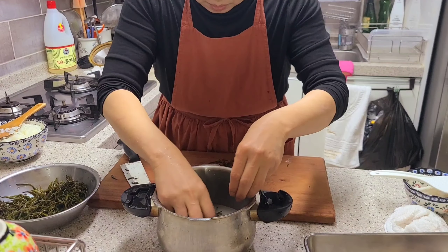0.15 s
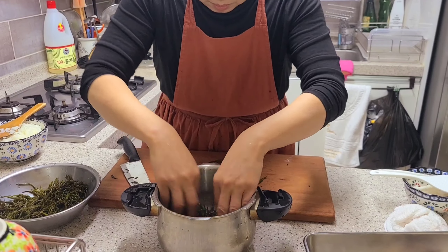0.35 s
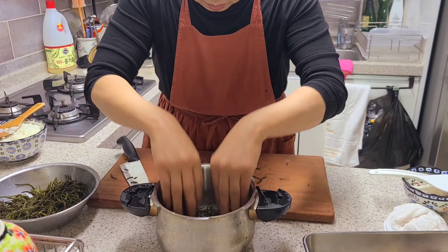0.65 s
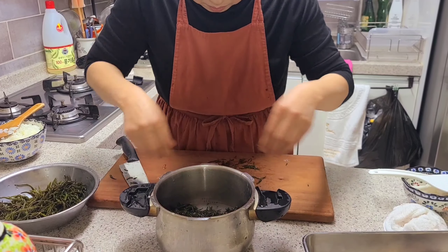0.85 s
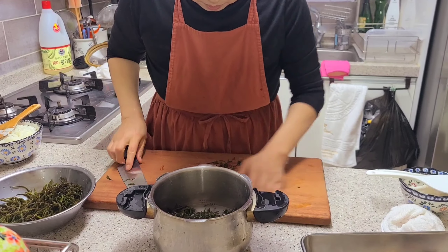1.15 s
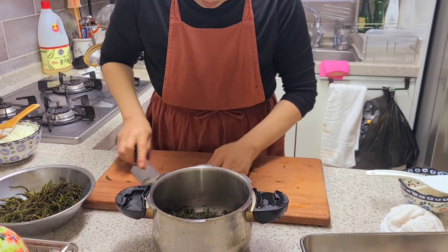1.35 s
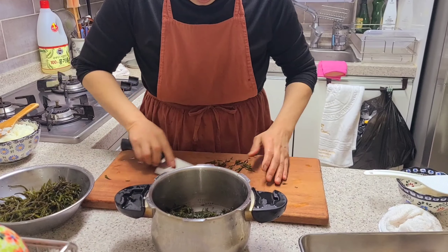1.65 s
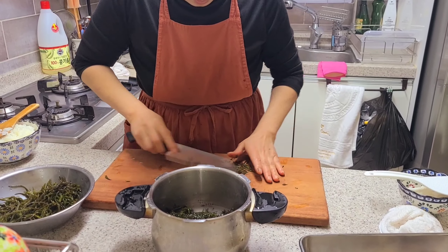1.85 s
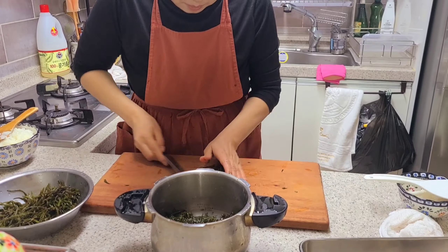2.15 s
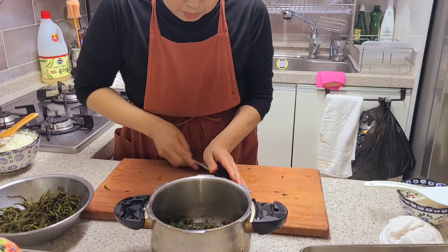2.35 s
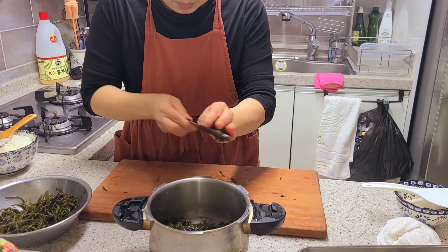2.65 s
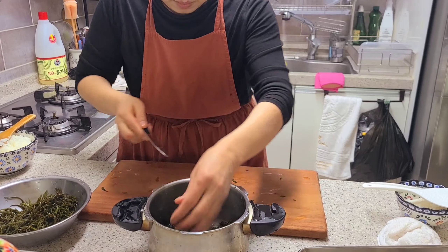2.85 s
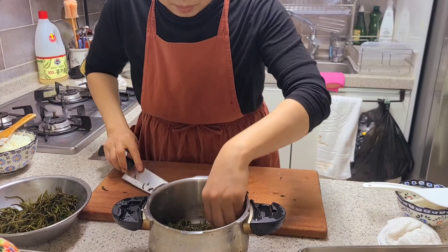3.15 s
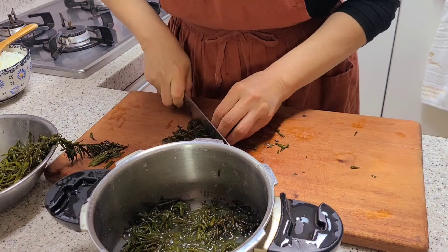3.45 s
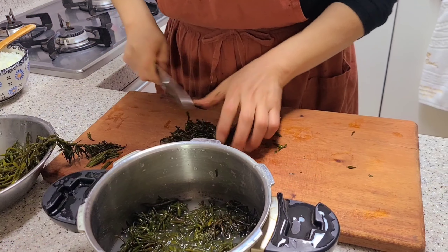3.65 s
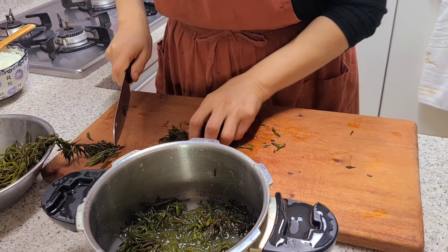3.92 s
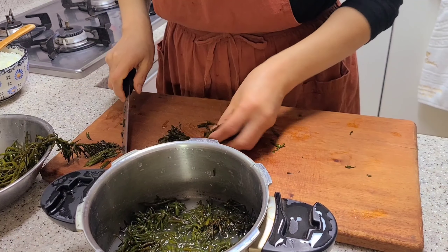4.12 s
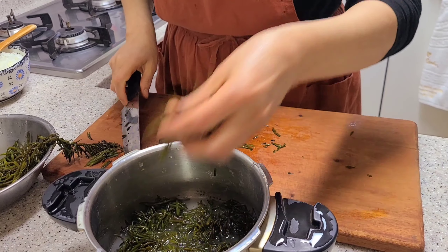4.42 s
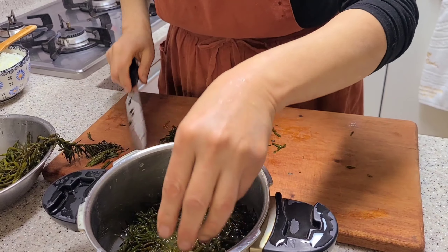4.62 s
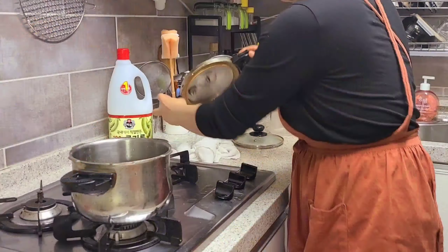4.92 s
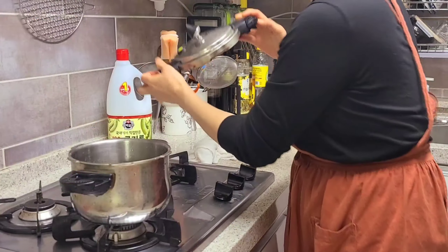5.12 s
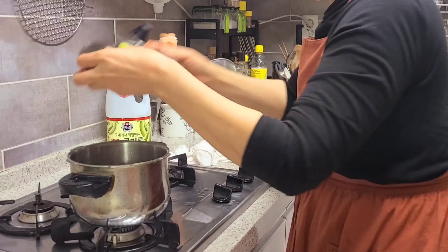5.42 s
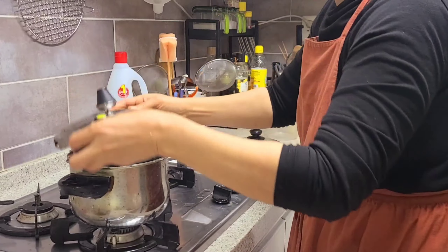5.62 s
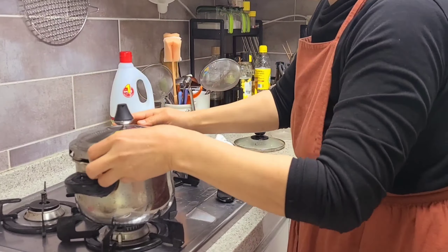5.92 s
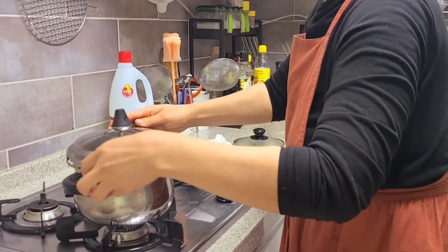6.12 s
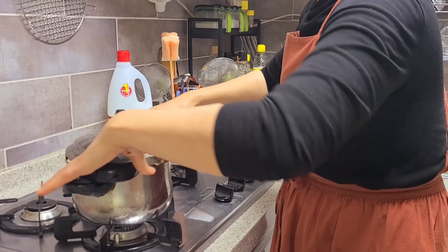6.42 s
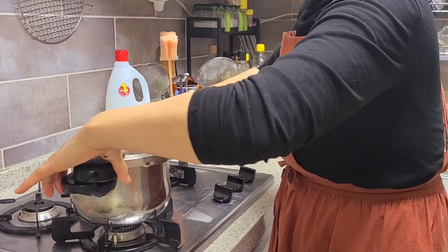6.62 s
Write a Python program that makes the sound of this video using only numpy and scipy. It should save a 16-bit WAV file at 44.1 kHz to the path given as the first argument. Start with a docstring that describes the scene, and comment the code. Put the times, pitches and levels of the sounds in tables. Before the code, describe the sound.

Wet greens rustle and a knife knocks and scrapes on a thick wooden board, then a steel pressure cooker lid clinks, scrapes and clunks shut.

```python
"""A bump of the cooker, then rustling wet greens and a knife knocking and scraping on a thick board in a kitchen.
Later a steel lid chatters over the rim of a pressure cooker, clinks and clunks, and its handle squeaks.
Blows ring banks of resonances; sliding drives them with tiny random catches and adds coloured hiss.
Greens are crackling noise, squeaks are wavering harmonics, and hob and still air are shaped noise."""
import sys
import numpy as np
from scipy import signal
from scipy.fft import rfft, irfft, next_fast_len
from scipy.io import wavfile
from scipy.ndimage import uniform_filter1d

SR = 44100
rng = np.random.default_rng(int(sys.argv[2]) if len(sys.argv) > 2 else 0)


def generate_wav(signal):
    """Clip the signal to [-1, 1] and save it as 16-bit WAV at the path in sys.argv[1]."""
    frames = np.transpose(np.atleast_2d(signal))
    scaled = np.clip(frames, -1, 1) * 32767
    pcm = np.round(scaled).astype(np.int16)
    wavfile.write(sys.argv[1], SR, pcm)


N = 298557
TIME = np.arange(N) / SR


def from_db(db):
    """Decibels to gain."""
    return 10 ** (np.asarray(db) / 20)


def rms_one(x):
    """Scale to unit power."""
    return x / np.sqrt(np.mean(x ** 2) + 1e-20)


def at_hz(points, hz):
    """Read a table on a log-frequency axis."""
    table = np.array(points)
    return np.interp(np.log(np.maximum(hz, 1)), np.log(table[:, 0]), table[:, 1])


def add(out, start_s, sound):
    """Mix a stereo sound in at a time."""
    at = round(start_s * SR)
    out[:, at:at + sound.shape[1]] += sound[:, :N - at]


def drift(per_s):
    """Smooth random wander of spread 1."""
    points = rng.standard_normal(N // 16)
    return rms_one(np.interp(TIME * per_s, np.arange(N // 16), points))


# how alike the two microphones hear noise: pitch_hz, correlation (no unit)
LIKENESS = [(100, 0.96), (350, 0.94), (800, 0.61), (1500, .15), (4000, 0)]


def noise(spectrum=((1, 0), (SR, 0)), size=N):
    """Coloured noise at two microphones, alike in the bass and unrelated in the treble."""
    padded = next_fast_len(size, real=True)
    hz = np.fft.rfftfreq(padded, 1 / SR)
    mid, side = rfft(rng.standard_normal((2, padded))) * from_db(at_hz(spectrum, hz))
    alike = np.clip(at_hz(LIKENESS, hz), -1, 1)
    pair = np.sqrt(1 + alike) * mid + np.sqrt(1 - alike) * side * [[1], [-1]]
    return rms_one(irfft(pair, padded)[:, :size])


def resonate(x, modes):
    """Parallel resonances of alternating sign; a wider one dies away sooner."""
    out = 0
    for k, (hz, width_hz, level_db) in enumerate(modes):
        r = np.exp(-np.pi * width_hz / SR)
        feed = np.array([1, 0, -1]) * (1 - r * r) / 2
        feedback = [1, -2 * r * np.cos(2 * np.pi * hz / SR), r * r]
        out = out + (-1) ** k * from_db(level_db) * signal.lfilter(feed, feedback, x)
    return out


def stroke(start_s, length_s, attack_s, release_s):
    """Envelope of one movement: it swells, holds to the end of its length and dies away."""
    age = TIME - start_s
    swell = np.sin(np.pi / 2 * np.clip(age / attack_s, 0, 1)) ** 2
    return swell * np.exp(-np.clip((age - length_s) / release_s, 0, 20))


def friction(rough_db, slips_per_s):
    """The uneven grip of a sliding contact."""
    return rms_one(from_db(rough_db * np.clip(drift(slips_per_s), -2, 2)))


def slips(per_s, spread_db):
    """Tiny catches of a sliding contact: random clicks of very unequal size, different at each microphone."""
    size = from_db(spread_db * np.minimum(rng.exponential(1, N), 3.5))
    happens = rng.random(N) < per_s / SR
    return rms_one(happens * size * rng.standard_normal((2, N)))


def radiate(source, spectrum, ring_s):
    """One contact shakes a thin plate, whose crowded modes reach each microphone with their own colour."""
    t = TIME[:SR // 20]
    plate = noise(spectrum, size=len(t)) * np.exp(-t / ring_s)
    return rms_one(signal.fftconvolve(source[None], plate, axes=1)[:, :N])


def first_10_ms(x):
    """Scale to unit power over the first 10 ms."""
    return x / np.sqrt(np.mean(x[:, :SR // 100] ** 2))


def blows(rows, modes, vary_db, bass_hz, firm_hz, soft_bass_db, tick_s, dense_db, dense_s, dense_hz,
          graze_db, graze_s, favour_db=0, favour_width=0.34):
    """Each contact rings the main modes and a dense short-lived body; the spot struck may favour one pitch."""
    out, t = np.zeros((2, N)), TIME[:SR // 5]
    dense_colour = [(dense_hz / 50, -25), (dense_hz / 15, 0), (dense_hz, 0), (2 * dense_hz, -22)]
    for start_s, level_db, contact_hz, tick_db, *favoured in rows:
        # the surfaces graze for a few milliseconds after they meet
        graze = noise(size=len(t)) * t * np.exp(-t / graze_s)
        graze = graze / np.sqrt(np.sum(graze ** 2) / 2)
        push = (t == 0) + from_db(graze_db) * graze + 1e-18
        # every blow excites the modes a little differently
        varied = np.array(modes) + np.outer(vary_db * rng.standard_normal(len(modes)), [0, 0, 1])
        ring = resonate(push, varied)
        dense = noise(dense_colour, size=len(t)) * np.exp(-t / dense_s)
        body = first_10_ms(ring) + from_db(dense_db) * first_10_ms(dense)
        # a soft contact leaves the high modes out, and gains bass for each octave that it lies under a firm one
        body = signal.sosfilt(signal.butter(2, min(contact_hz, SR / 2 - 1), fs=SR, output="sos"), body)
        bass_db = soft_bass_db * np.log2(firm_hz / contact_hz)
        bass = signal.lfilter(*signal.butter(1, bass_hz, fs=SR), body)
        body = body + (from_db(bass_db) - 1) * bass
        body = body + resonate(body, [(hz, favour_width * hz, favour_db) for hz in favoured])
        tick = noise(size=len(t)) * np.exp(-t / tick_s)
        blow = first_10_ms(body) + from_db(tick_db) * first_10_ms(tick)
        add(out, start_s, from_db(level_db) * blow)
    return out


# time for the tail to fall by 60 dB: pitch_hz, decay_s
ROOM_T60 = [(80, 0.68), (300, 0.4), (800, 0.38), (1700, 0.43), (4000, 0.33), (8000, .3), (15000, 0.24)]
# standing wave between the walls: pitch_hz, width_hz, level_db
ROOM_MODE = [(71, 8.5, 4)]


def kitchen(x, early_db, late_db, early_t60_s=0.11):
    """Quick reflections from the worktop and tiles, then the tail and the low boom of the room."""
    t = TIME[:SR // 2]
    hz = np.fft.rfftfreq(len(t), 1 / SR)
    field = rfft(noise(size=len(t)))
    tail = 0
    for centre_hz, t60_s in ROOM_T60:
        # overlapping bands, each with its own decay
        share = at_hz([(f, f == centre_hz) for f, _ in ROOM_T60], hz)
        tail = tail + irfft(field * share, len(t)) * from_db(-60 * t / t60_s)
    early = noise(size=len(t)) * from_db(-60 * t / early_t60_s)
    echoes = from_db(early_db) * rms_one(early * (t > .002)) + from_db(late_db) * rms_one(tail * (t > .008))
    reflected = signal.fftconvolve(x, echoes / np.sqrt(len(t)), axes=1)[:, :N]
    return x + reflected + resonate(x, ROOM_MODE)


# colour of the kitchen's still air: pitch_hz, level_db
AIR_COLOUR = [(20, -31), (40, -17.5), (55, 0), (72, 0.5), (100, -13.5), (140, -21.5), (240, -13),
              (330, -20), (600, -23.5), (1300, -24.5), (3000, -29.5), (5000, -34.5), (7500, -35),
              (16000, -44.5)]
AIR_DB = -64.5


def still_air():
    """Steady coloured noise, the quiet of the kitchen."""
    return from_db(AIR_DB) * noise(AIR_COLOUR)


# colour of the hob swaying: pitch_hz, level_db
SWAY_COLOUR = [(10, 8.5), (20, 14), (26, 16.5), (34, 6), (50, 5), (100, -60.5)]
# colour of the cooker grinding on the grate: pitch_hz, level_db
GRIND_COLOUR = [(35, -8), (55, 0.5), (72, 3), (90, -0.5), (120, -3.5), (200, -6), (450, -18.5), (800, -32),
                (2000, -59)]
# shoves that grind the cooker: start_s, length_s, level_db
SHOVES = [(5.867, 0.17, -43), (6.085, 0.073, -33), (6.527, 0.08, -44)]
SHOVE_ATTACK_S, SHOVE_RELEASE_S = 0.016, 0.1
# the hob sways as the hands lean on the lid, and settles as they let go
LEAN_START_S, LEAN_LENGTH_S, LEAN_ATTACK_S, LEAN_RELEASE_S, LEAN_DB = 5.81, 0.51, 0.17, 0.48, -41


def hob():
    """The heavy cooker sways under the hands and grinds on the grate at each shove."""
    sway = from_db(LEAN_DB) * stroke(LEAN_START_S, LEAN_LENGTH_S, LEAN_ATTACK_S, LEAN_RELEASE_S)
    grind = sum(from_db(level_db) * stroke(start_s, length_s, SHOVE_ATTACK_S, SHOVE_RELEASE_S)
                for start_s, length_s, level_db in SHOVES)
    return sway * noise(SWAY_COLOUR) + grind * noise(GRIND_COLOUR)


# wet greens gathered and dropped: start_s, level_db, time_to_peak_s
RUSTLES = [(0.33, -68, 0.028), (0.532, -59.5, 0.0036), (0.558, -54, 0.0087), (1.061, -61.5, 0.077),
           (2.917, -55.5, 0.01), (3.546, -61.5, 0.0098), (3.608, -63.5, 0.0084), (3.794, -70.5, 0.061),
           (4.523, -53.5, 0.011)]
# colour of the leaves: pitch_hz, level_db
LEAF_COLOUR = [(300, -1), (900, -10), (1500, 0.5), (2200, 0.5), (3300, -4.5), (5000, -5), (9000, -9.5),
               (16000, -13)]


def greens():
    """Each handful is a short swell of wet crackle."""
    swell = 0
    for start_s, level_db, peak_s in RUSTLES:
        age = np.maximum(TIME - start_s, 0) / peak_s
        swell = swell + from_db(level_db) * age * np.exp(1 - age)
    return swell * noise(LEAF_COLOUR) * friction(rough_db=2.5, slips_per_s=460)


# stick-slip of the knife on the wood and of the lid's handle: start_s, length_s, pitch_hz, level_db
SQUEAKS = [(1.12, .028, 266, -41.5), (1.221, .022, 400, -42), (2.035, .09, 448, -38),
           (5.098, .018, 785, -54), (6.584, .018, 528, -29), (6.60, .03, 528, -20.5)]
# harmonics of a squeak: multiple (of the pitch), level_db
SQUEAK_PARTIALS = [(1, 6), (2, -16), (3, -14), (4, -23), (5, -25), (6, -29)]
SQUEAK_ATTACK_S, SQUEAK_RELEASE_S = .009, .009
SQUEAK_SAG = 0.054   # share of its pitch that a squeak loses as the motion slows


def squeaks(jitter=0.02, rough_db=2.5):
    """Sticking and slipping in a nearly regular rhythm gives short rough tones that sag in pitch."""
    out, waver = 0, 1 + jitter * drift(300)
    for start_s, length_s, hz, level_db in SQUEAKS:
        sag = 1 - SQUEAK_SAG * np.clip((TIME - start_s) / length_s, 0, 1)
        phase = 2 * np.pi * np.cumsum(hz * waver * sag) / SR
        tone = sum(from_db(partial_db) * np.sin(multiple * phase) for multiple, partial_db in SQUEAK_PARTIALS)
        envelope = stroke(start_s, length_s, SQUEAK_ATTACK_S, SQUEAK_RELEASE_S)
        out = out + from_db(level_db) * rms_one(tone) * envelope
    return out * friction(rough_db, 250) * np.ones((2, 1))


# the cooker is bumped, on the worktop and later on the hob: start_s, level_db, contact_cutoff_hz, tick_db
CLUNKS = [(0.1205, -35.5, 1000, -24), (5.797, -36, 1200, -29), (5.839, -27.5, 1300, -32),
          (5.8725, -13.5, 1400, -24), (5.981, -17.5, 680, -31), (5.997, -18, 900, -34),
          (6.023, -17, 1500, -29), (6.041, -25.5, 1500, -27), (6.064, -26, 1200, -28),
          (6.562, -33.5, 900, -35), (6.623, -25, 1800, -15.5), (6.724, -41.5, 3200, -26)]
# resonances of the loaded cooker: pitch_hz, width_hz, level_db
COOKER = [(215.3, 41, -7), (285, 26, -1.5), (317, 18.4, 6.5), (405, 38, 5.5), (475, 43, 2.5),
          (562, 78, -3.5), (687, 40, -4.5), (851, 42, -4.5), (994, 71, -3), (1080, 84, -2.5),
          (1257, 50, -4.5), (1500, 170, -12.5)]


def cooker_clunks():
    """Mostly soft bumps leave the treble out and ring the low modes of the loaded cooker."""
    return blows(CLUNKS, COOKER, vary_db=0.0, bass_hz=250, firm_hz=2000, soft_bass_db=5, tick_s=0.007,
                 dense_db=-7.5, dense_s=0.017, dense_hz=3400, graze_db=-10.0, graze_s=0.0013)


# lid sliding on the rim: start_s, length_s, ring_db, hiss_db
SLIDES = [(5.276, 0.047, -42.5, -66), (5.408, 0.095, -37, -53), (5.454, 0.034, -28, -32.5),
          (5.528, 0.021, -24.5, -29), (5.706, 0.078, -50.5, -69), (5.785, 0.069, -50, -47.5),
          (5.887, 0.11, -26, -38.5), (6.014, 0.057, -30, -27.5), (6.104, 0.082, -28, -30.5),
          (6.262, 0.01, -33, -42), (6.564, 0.064, -41.5, -43.5)]
# steel lid and rim, damped by hands and gasket: pitch_hz, width_hz, level_db
STEEL = [(430, 96, -8.5), (606, 62, -3.5), (1055, 40, -10.5), (1276, 41, -3), (1490, 100, -6.5),
         (1713, 99, -7), (1912, 64, -2), (2079, 34, 5), (2207, 68, -2.5), (2500, 61, -2), (2747, 65, -0.5),
         (3000, 71, 3), (3134, 49, 3), (3260, 31, 5.5), (3310, 26, 3.5), (3520, 194, -3.5),
         (3890, 22, -8.5), (4030, 42, -3), (4300, 193, -7), (4884, 44, -11), (6000, 310, -21),
         (6570, 70, -32), (7020, 81, -13), (7140, 20, -10), (7240, 60, -26), (8700, 140, -39.5)]
# colour of the rubbing rim: pitch_hz, level_db
RIM_HISS = [(300, -4.5), (600, 4), (1200, 14), (2500, 11.5), (4300, 14), (5300, 3.5), (7000, 16),
            (9000, -16), (12000, 1), (14000, 3.5), (16000, -13)]
SLIDE_ATTACK_S, RING_RELEASE_S, HISS_RELEASE_S = 0.012, 0.034, 0.014


def lid_slides(ring_trim_db=-3, hiss_trim_db=-1):
    """Steel chatters over steel and keeps lid and rim ringing; the hiss stops sooner than the ring."""
    ring_level = sum(from_db(ring_db) * stroke(start_s, length_s, SLIDE_ATTACK_S, RING_RELEASE_S)
                     for start_s, length_s, ring_db, _ in SLIDES)
    hiss_level = sum(from_db(hiss_db) * stroke(start_s, length_s, SLIDE_ATTACK_S, HISS_RELEASE_S)
                     for start_s, length_s, _, hiss_db in SLIDES)
    grain = friction(rough_db=4.5, slips_per_s=250) * rng.standard_normal(N)
    ring = rms_one(resonate(slips(per_s=300, spread_db=3.5), STEEL))
    hiss = radiate(grain, RIM_HISS, ring_s=0.0055)
    return from_db(ring_trim_db) * ring_level * ring + from_db(hiss_trim_db) * hiss_level * hiss


# lid touches the rim: start_s, level_db, contact_cutoff_hz, tick_db
CLINKS = [(5.046, -42, 4500, -27), (5.259, -44, 6000, -28.5), (5.291, -39.5, 4000, -25),
          (5.419, -38, 3500, -32), (5.466, -30, 7000, -18), (5.539, -21, 9100, -16),
          (5.549, -26, 6000, -28), (5.796, -34, 6000, -5), (5.838, -35.5, 5000, -20),
          (5.875, -23, 4960, -9), (5.984, -26, 9100, -5.5), (6.026, -26, 8000, -6),
          (6.067, -24.5, 8000, -16), (6.126, -25, 8050, -15), (6.522, -42, 3000, -21),
          (6.562, -36.5, 5000, -11)]


def lid_clinks():
    """Hard edges meet with a long graze and ring the damped steel of lid and rim."""
    return blows(CLINKS, STEEL, vary_db=3.0, bass_hz=900, firm_hz=6000, soft_bass_db=6.5, tick_s=0.0021,
                 dense_db=-9.0, dense_s=0.02, dense_hz=6000, graze_db=14, graze_s=0.0039)


# sweeps of the blade over the wood: start_s, length_s, level_db, weight_db (pressure on the blade)
SWEEPS = [(1.289, .19, -32.5, -20), (1.656, 0.086, -31, -18), (2.099, 0.096, -33.5, -6.5),
          (2.258, 0.068, -35.5, -2.5)]
# resonances of the knife blade: pitch_hz, width_hz, level_db
BLADE = [(260, 53, -25), (430, 63, -19), (600, 61, -3), (699, 77, 1.5), (1200, 55, 3.5), (1400, 140, -4),
         (1814, 100, 3.5), (2328, 69, 1.5), (3020, 120, -2.5), (3690, 180, -6.5), (4330, 250, -13)]
# colour of the edge on the grain: pitch_hz, level_db
WOOD_HISS = [(600, -24.5), (1500, 1), (3000, -2), (4500, -1.5), (7000, 0.5), (10000, -1), (16000, -5)]
# colour of the board under the drag: pitch_hz, level_db
BOARD_RUMBLE = [(30, -21), (75, -1), (110, -2.5), (220, -2.5), (450, -2), (700, -4.5), (1500, -32.5)]
SWEEP_RELEASE_S = .026
HISS_LOSS_PER_WEIGHT = 0.52   # dB of hiss lost for each dB of weight: a heavy blade rumbles, a light one hisses
# pressed hard after its knock, the edge skips over the wood before it slides
SKID_START_S, SKID_LENGTH_S, SKID_ATTACK_S, SKID_RUMBLE_DB = 2.005, 0.11, .009, -40


def knife_sweeps(blade_db=-1, hiss_db=-13, board_db=-4, bend=.03):
    """Wood grain catches on the edge: it hisses, rings the blade and rumbles in the board."""
    # scraps of greens under the edge make the drag lumpy
    lumps = friction(rough_db=1.8, slips_per_s=70)
    grip = lumps * friction(rough_db=3.0, slips_per_s=500)
    catches = lumps * slips(per_s=700, spread_db=3.0)
    blade, edge = 0, 0
    board = from_db(SKID_RUMBLE_DB) * stroke(SKID_START_S, SKID_LENGTH_S, SKID_ATTACK_S, SWEEP_RELEASE_S)
    for start_s, length_s, level_db, weight_db in SWEEPS:
        # the blade gathers speed over the whole sweep
        speed = from_db(level_db) * stroke(start_s, length_s, length_s, SWEEP_RELEASE_S)
        blade = blade + from_db(blade_db) * speed
        edge = edge + from_db(hiss_db - HISS_LOSS_PER_WEIGHT * weight_db) * speed
        board = board + from_db(board_db + weight_db) * speed
    # the contact point travels along the blade, which bends its resonances up and down
    warped = np.cumsum(1 + bend * drift(14)) / SR

    def bent(sound):
        """Play at a wandering speed."""
        return rms_one(np.array([np.interp(warped, TIME, side) for side in sound]))

    ring = bent(resonate(catches, BLADE))
    hiss = bent(radiate(grip * rng.standard_normal(N), WOOD_HISS, ring_s=0.0044))
    return blade * ring + edge * hiss + board * lumps * noise(BOARD_RUMBLE)


# the flat of the blade is set down: start_s, level_db, contact_cutoff_hz, tick_db
BLADE_TAPS = [(3.237, -34, 4500, -24.5)]
# the blade lying flat on the board: pitch_hz, width_hz, level_db
FLAT_BLADE = [(258, 28, 0), (1300, 47, -2), (1464, 41, -2), (1960, 22, -5), (2570, 82, -15), (3320, 54, 0),
              (3690, 21, -13), (4030, 52, -8)]


def blade_taps():
    """A firm flat contact rings the blade against the wood."""
    return blows(BLADE_TAPS, FLAT_BLADE, vary_db=2.5, bass_hz=400, firm_hz=4000, soft_bass_db=1, tick_s=0.0092,
                 dense_db=-4.5, dense_s=0.0088, dense_hz=4500, graze_db=-6, graze_s=.002)


SKIPS_PER_S, SKIP_DB, SKIP_CONTACT_HZ, SKIP_TICK_DB = 52, -38.5, 1500, -12.5


def skips(count=5):
    """The skidding edge lands on the board again and again, nearly evenly."""
    rows = []
    for k, (late, hard) in enumerate(rng.standard_normal((count, 2))):
        start_s = SKID_START_S + (k + 2 + 0.09 * late) / SKIPS_PER_S
        rows.append((start_s, SKIP_DB + 2 * hard, SKIP_CONTACT_HZ, SKIP_TICK_DB))
    return rows


# knife and hands on the board: start_s, level_db, contact_cutoff_hz, tick_db, favoured_hz
KNOCKS = [(0.372, -61.5, 500, -13, 300), (0.542, -61.5, 400, -17, 250), (1.046, -44, 455, -22, 400),
          (1.106, -30, 440, -49, 280), (1.6415, -14, 2500, -32.5, 1000), (2.002, -27.5, 1910, -20.5, 1080),
          (3.351, -26.5, 2000, -54, 1000), (3.578, -54, 148.8, -30, 89), (3.699, -42.5, 1000, -28.5, 430),
          (4.0885, -17, 1900, -32, 1550), (5.011, -46, 800, -30, 215)]
# resonances of the board with the knife on it: pitch_hz, width_hz, level_db
BOARD = [(176, 30, -4.5), (261, 19, 0.5), (400, 48, 0.5), (480, 78, 0.5), (610, 62, -2.5), (761, 120, -6.5),
         (824, 79, -4.5), (1000, 96, -3), (1181, 180, -0.5), (1310, 160, -1), (1480, 130, -4),
         (1810, 150, -4.5), (2080, 97, -8.5), (3100, 450, -5.5), (3675, 290, -12.5)]


def knife_knocks():
    """Blows and skips ring the thick board, each knock favouring the pitch of the spot it strikes."""
    return blows(KNOCKS + skips(), BOARD, vary_db=0.5, bass_hz=300, firm_hz=2200, soft_bass_db=4.0,
                 tick_s=0.0044, dense_db=-3, dense_s=.013, dense_hz=1800, graze_db=-3, graze_s=0.0013,
                 favour_db=3)


def scene():
    """Board work, then the lid, over the still air of the kitchen."""
    board = kitchen(from_db(-1) * (knife_knocks() + blade_taps()), early_db=-3.5, late_db=-7.5)
    rubbing = kitchen(knife_sweeps() + greens(), early_db=-7.5, late_db=-7.5)
    squeaking = kitchen(squeaks(), early_db=-11, late_db=-12)
    steel = from_db(-1.0) * lid_clinks() + from_db(-2.5) * cooker_clunks() + lid_slides()
    cooker = kitchen(steel, early_db=-3.5, late_db=-6.0)
    return board + rubbing + squeaking + cooker + hob() + still_air()


# the level dips briefly: start_s, end_s
DROPOUT = (5.028, 5.045)
STOPBAND_HZ = 16800   # 70 dB down from here up


def record(dry, lag_s=.00011):
    """The sound reaches the left microphone slightly earlier and drops out once; the top is cut."""
    right = np.interp(TIME - round(lag_s * SR) / SR, TIME, dry[1])
    pair = np.array([dry[0], right])
    dropped = (TIME > DROPOUT[0]) & (TIME < DROPOUT[1])
    heard = uniform_filter1d(np.where(dropped, .03, 1.), size=64)
    return signal.sosfilt(signal.cheby2(20, 70, STOPBAND_HZ, fs=SR, output="sos"), pair * heard)


dry = scene()
out = record(dry)
generate_wav(out)
```